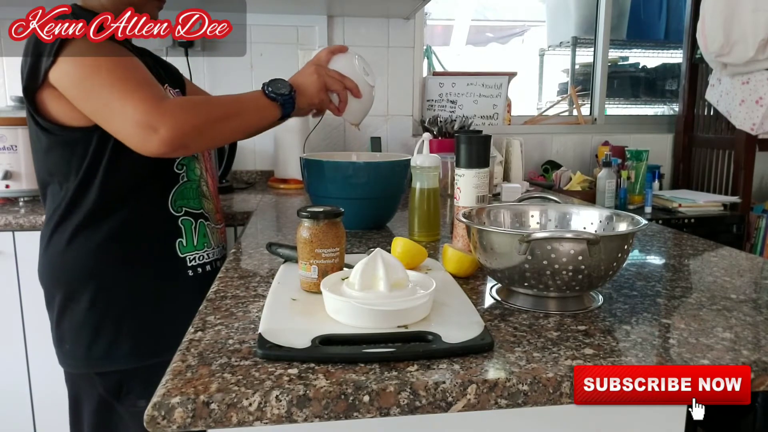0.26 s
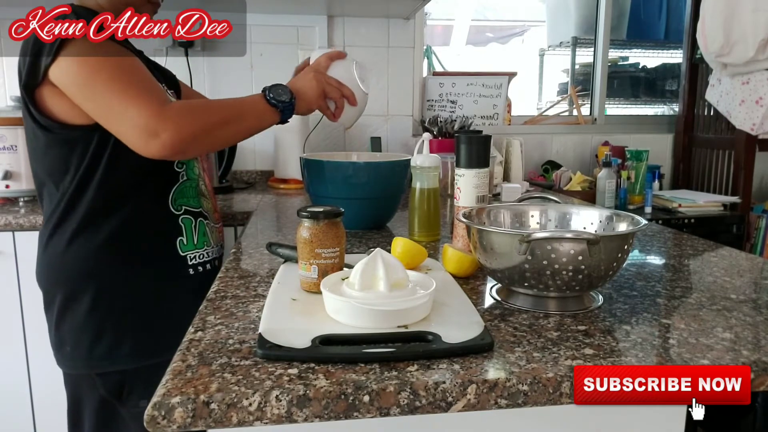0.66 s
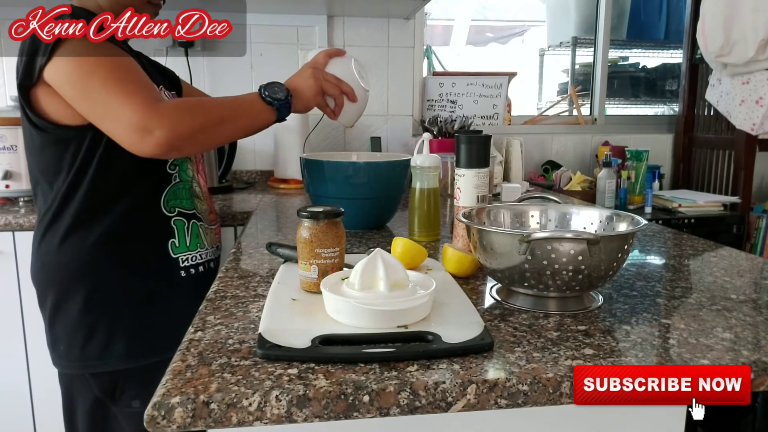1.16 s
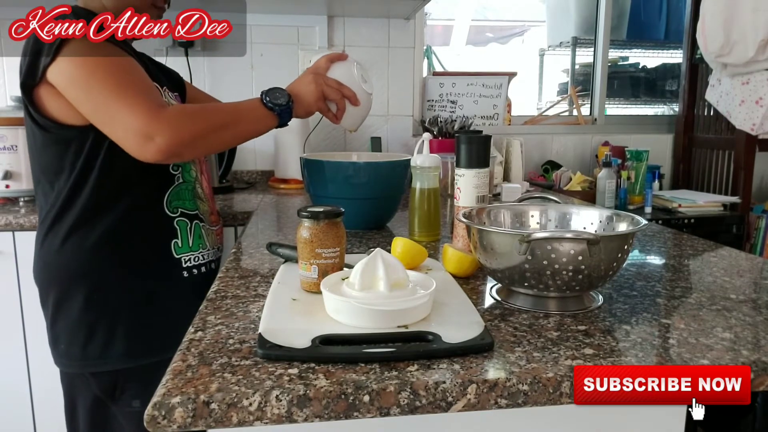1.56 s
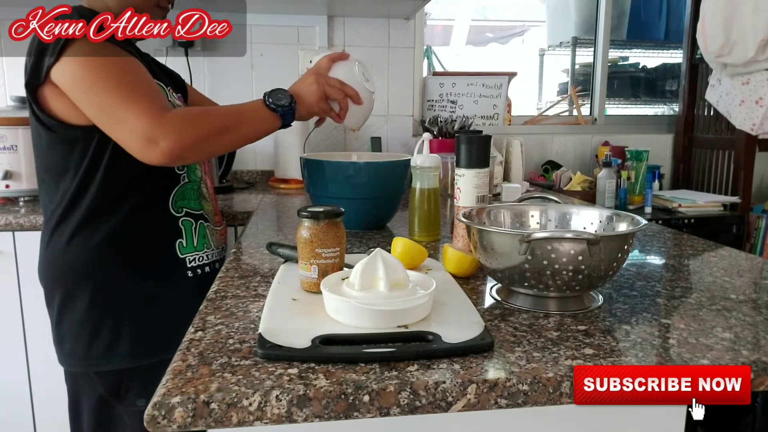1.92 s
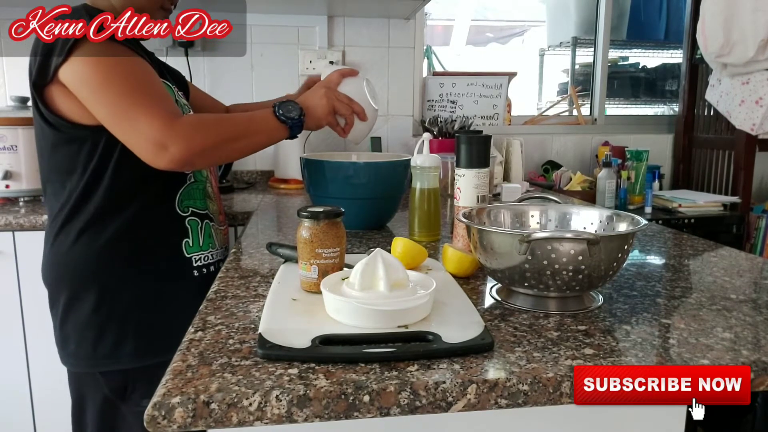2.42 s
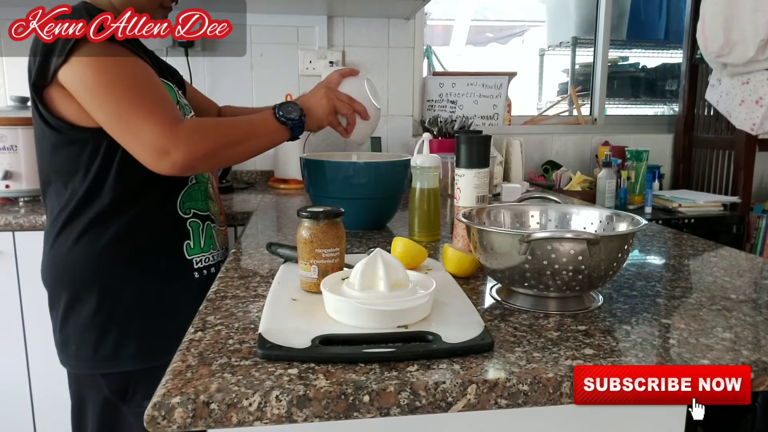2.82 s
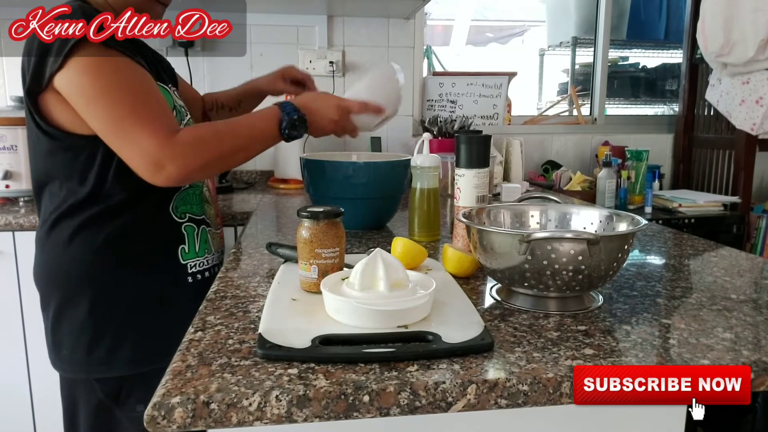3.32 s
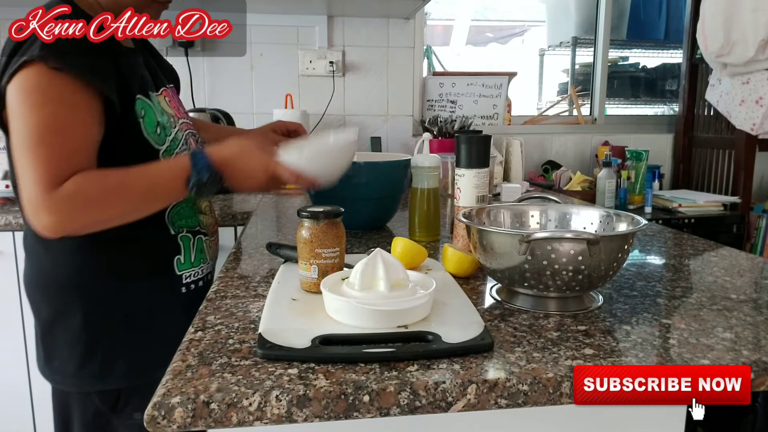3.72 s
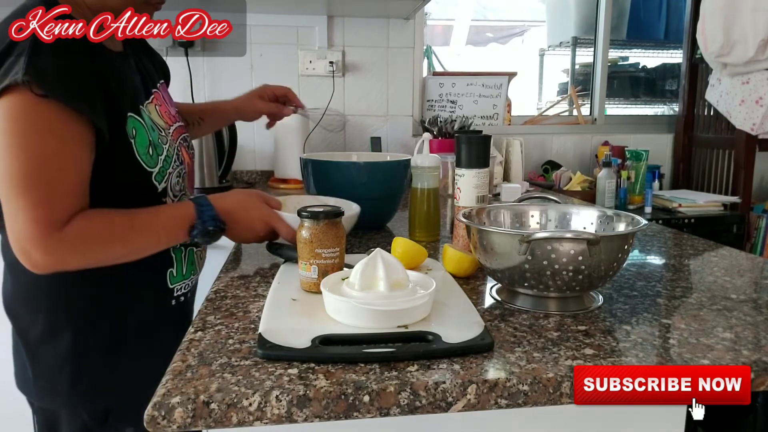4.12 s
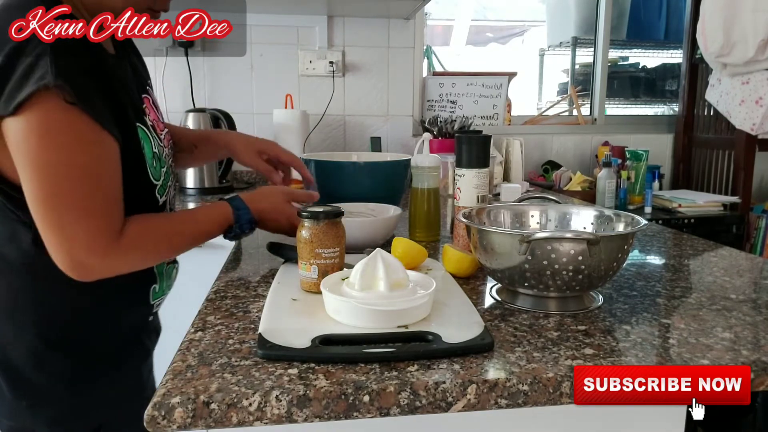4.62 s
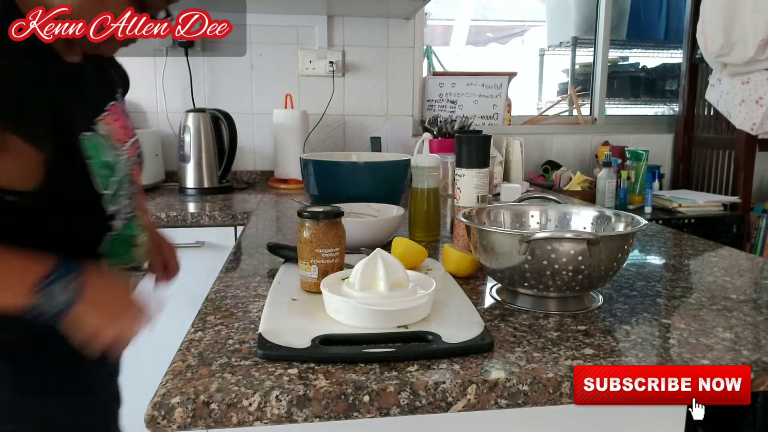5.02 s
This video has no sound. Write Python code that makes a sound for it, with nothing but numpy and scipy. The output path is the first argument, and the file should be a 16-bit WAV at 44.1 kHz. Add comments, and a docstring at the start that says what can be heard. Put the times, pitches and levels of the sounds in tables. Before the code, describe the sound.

Light metallic taps and short dry scrapes repeat unevenly inside a small ceramic bowl. The bowl then clinks twice, pauses, and is set down hard on a stone counter, knocking and rattling in rapid rebounds while the spoon bounces with a high ring. Quiet returns, with slight touches and a soft swish of movement. Stereo microphone a short distance away, slightly left-weighted, hard kitchen reverberation and low background rumble.

```python
"""Spoon scraping a china bowl

In a tiled kitchen a steel spoon scrapes a small bowl, three or four strokes a second: filtered grains of slip.
The bowl clinks twice and is set down rocking on stone; the loose spoon bounces in it: decaying modes and noise.
A soft shuffle follows. Shaped noise rumbles below; the recorder's gain control ducks at the clatter.
"""
import sys
import numpy as np
from scipy import signal
from scipy.fft import rfft, irfft
from scipy.io import wavfile
from scipy.ndimage import uniform_filter1d

SR = 44100
rng = np.random.default_rng(int(sys.argv[2]) if len(sys.argv) > 2 else 0)


def to_wav(sig):
    """Store sig (one row per channel, or 1-D mono) as 16-bit WAV at the path in sys.argv[1].

    Samples outside -1..1 are clipped; the rate is SR.
    """
    pcm = np.clip(np.atleast_2d(sig), -1, 1) * 32767
    pcm = np.round(pcm).astype(np.int16)
    wavfile.write(sys.argv[1], SR, pcm.T)  # frames by channels


N = 232362
TIME = np.arange(N) / SR
CUTOFF_HZ = 15800

# hiss of steel on china, broad shape: (frequency [Hz], relative level [dB])
HISS_SHAPE = [(300, -30.5), (1500, -0.5), (3800, -12.5), (4600, -2), (6500, 0.5), (9500, -2), (12000, -1),
              (15500, 0.5)]
# resonances on that hiss: (frequency [Hz], width [Hz], boost [dB])
HISS_RESONANCES = [(5030, 160, 6.1), (6030, 300, 6), (6620, 380, 5.6), (7800, 270, 4.4), (8940, 260, 2.1),
                   (10300, 200, 4), (12000, 550, 5.6), (12400, 280, 4), (13700, 470, 1.1)]


def from_db(db):
    """Decibels to amplitude gain."""
    return 10 ** (np.asarray(db) / 20)


def rms_one(x):
    """Scale to rms 1."""
    return x / np.sqrt(np.mean(x ** 2) + 1e-20)


def at_hz(points, hz):
    """Interpolate a table on a log-frequency axis."""
    points = np.array(points)
    log_hz = np.log(np.maximum(hz, 1))
    return np.interp(log_hz, np.log(points[:, 0]), points[:, 1])


def add(out, start_s, sound):
    """Mix a short sound into out at start_s."""
    at = round(start_s * SR)
    out[at:at + len(sound)] += sound[:N - at]


def through(x, shape, peaks=(), size=4096):
    """Minimum-phase filter of a body: broad shape plus resonances; keeps the power of white noise."""
    hz = np.arange(size // 2 + 1) * SR / size
    level_db = at_hz(shape, hz)
    for peak_hz, width_hz, db in peaks:
        level_db = level_db + db / (1 + (2 * (hz - peak_hz) / width_hz) ** 2)
    low_cut = (hz + 1) / (hz + shape[0][0])
    gain = from_db(level_db) * low_cut / (1 + (hz / CUTOFF_HZ) ** 20)
    # fold the cepstrum to make the response causal
    cepstrum = irfft(np.log(gain))[:size // 2]
    cepstrum[0] = 0
    response = irfft(np.exp(rfft(2 * cepstrum, size)))
    return signal.fftconvolve(x, response / np.linalg.norm(response))[:N]


def struck(modes, spread_db):
    """Decaying sines (frequency [Hz], level [dB], t60 [s]), each level varied at random per blow."""
    t = TIME[:SR]
    ring = np.zeros(len(t))
    for hz, db, t60_s in modes:
        strength = from_db(db + spread_db * rng.normal())
        ring += strength * np.sin(2 * np.pi * hz * t) * np.exp(-np.log(1000) * t / t60_s)
    return ring


def grains(per_s, spread_db):
    """Tiny slips of uneven size and random sign at random moments; rms 1."""
    sizes = from_db(spread_db * np.minimum(rng.exponential(1, N), 4))
    signed = sizes * rng.choice([-1, 1], N)
    return rms_one(signed * (rng.random(N) < per_s / SR))


def bursts(contacts, decay_s):
    """Each contact (time [s], level [dB]) chatters as decaying random-sign noise."""
    force = np.zeros(N)
    for start_s, db in contacts:
        add(force, start_s, from_db(db) * np.exp(-TIME[:SR // 4] / decay_s))
    return force * rng.choice([-1, 1], N)


def hump(peak_s, swell_s, fade_s):
    """Pressure that swells to 1 at peak_s and fades, Gaussian on each side."""
    width_s = np.where(TIME < peak_s, swell_s, fade_s)
    return np.exp(-np.minimum(((TIME - peak_s) / width_s) ** 2, 50))


def tilted(pair, left_db):
    """Stereo balance: left over right by left_db."""
    return pair * from_db([[left_db / 2], [-left_db / 2]])


def room_tail(size=32768):
    """Diffuse reflections of even colour that die octave by octave; energy 1."""
    # kitchen reverberation: (frequency [Hz], t60 [s])
    kitchen_t60 = [(150, 0.33), (1000, 0.29), (3000, 0.21), (7000, 0.26), (11000, 0.29), (15000, 0.26)]
    t, hz = TIME[:size], np.arange(size // 2 + 1) * SR / size
    octave = np.round(np.log2(np.clip(hz, 125, 16000) / 125))
    white = rfft(rng.standard_normal(size))
    tail = np.zeros(size)
    for k in np.unique(octave):
        band = octave == k
        t60_s = at_hz(kitchen_t60, hz[band].mean())
        tail += irfft(white * band) * np.exp(-np.log(1000) * t / t60_s)
    spectrum = rfft(tail * (1 - np.exp(-t / 0.001)))
    # even out the colour, then close the far end
    tail = irfft(spectrum / np.sqrt(np.abs(spectrum) + 1e-9)) / (1 + (t / 0.3) ** 10)
    return tail / np.linalg.norm(tail)


def kitchen(x, wet_db, left_db, lag_samples=4):
    """Direct sound, later on the right, plus a separate room tail per channel, power-normalised."""
    direct = np.array([x, np.roll(x, lag_samples)])
    echoes = np.array([signal.fftconvolve(x, room_tail())[:N] for channel in direct])
    wet = from_db(wet_db)
    return tilted((direct + wet * echoes) / np.hypot(1, wet), left_db)


def background(spectrum, level_db, left_db):
    """Steady shaped noise, much alike in both channels in the bass only."""
    # stereo image: (frequency [Hz], left-right likeness [0..1])
    likeness = [(60, 0.97), (130, 0.89), (250, 0.86), (500, 0.45), (1000, 0.15), (2500, 0.048), (10000, .1)]
    hz = np.arange(N // 2 + 1) * SR / N
    alike = np.clip(at_hz(likeness, hz), 0, 1)
    gain = from_db(at_hz(spectrum, hz)) * hz / (hz + spectrum[0][0])
    mid, side = rfft(rng.standard_normal((2, N))) * gain
    pair = irfft(np.sqrt(1 + alike) * mid + np.sqrt(1 - alike) * side * [[1], [-1]], N)
    return tilted(from_db(level_db) * rms_one(pair), left_db)


def room_noise():
    """Low rumble and the faint air above it."""
    # rumble: (frequency [Hz], relative density [dB per Hz])
    rumble_spectrum = [(15, -51.5), (25, -25), (32, -18.5), (45, -27.5), (58, -2), (85, 1.5), (113, -1),
                       (128, -11.5), (149, -4.5), (179, -7), (249, -4.5), (266, -3.5), (415, -13),
                       (792, -17.5), (1300, -26.5), (1690, -51), (2860, -120)]
    # air: (frequency [Hz], relative density [dB per Hz])
    air_spectrum = [(600, -10.5), (1300, -2), (1900, -7), (2700, -14.5), (3400, -22.5), (5000, -28),
                    (6500, -26.5), (9000, -30.5), (15500, -32)]
    rumble = background(rumble_spectrum, level_db=-41.5, left_db=-3.0)
    return rumble + background(air_spectrum, level_db=-61.0, left_db=-4.0)


def shuffle():
    """Soft swish of feet and clothes as the cook steps away: dense grains under an envelope."""
    # envelope: (time [s], level [dB])
    swish_levels = [(5.16, -70.5), (5.21, -51.5), (5.245, -40.5), (5.27, -49)]
    # spectrum: (frequency [Hz], relative level [dB])
    swish_shape = [(300, 9), (1600, -4), (3500, -3.5), (6000, -6), (10000, -18), (15500, -29)]
    level = from_db(np.interp(TIME, *np.transpose(swish_levels), left=-200))
    swish = through(level * grains(per_s=14000, spread_db=3.5), swish_shape)
    return kitchen(swish, wet_db=3.0, left_db=0.0)


def loose_spoon():
    """Let go, the spoon bounces in the bowl and its free modes ring high."""
    # bounces: (time [s], level [dB])
    bounces = [(4.5723, -22.5), (4.581, -27.5), (4.603, -26.5)]
    # free spoon modes: (frequency [Hz], level [dB], t60 [s])
    spoon_modes = [(4883, -16, .25), (5825, -5, .13), (6595, -11, .17), (7903, -2, .07), (8936, -10, .13),
                   (10550, -11, .15), (11020, -1, .2), (12880, -1, .16), (14910, 1, .14), (15520, 5, .12)]
    ticks = through(bursts(bounces, decay_s=0.0081), HISS_SHAPE, HISS_RESONANCES)
    rings = np.zeros(N)
    for start_s, db in bounces:
        add(rings, start_s, from_db(db) * struck(spoon_modes, spread_db=3.9))
    return kitchen(from_db(2.0) * ticks + rings, wet_db=0.0, left_db=-2.5)


def clinks():
    """The china rings freely; the place struck sets the strength of each mode."""
    # clinks: (time [s], level [dB], place [0 rim .. 1 wall against the mixing bowl])
    clink_hits = [(3.697, -29, 0.03), (3.892, -30, 0.92)]
    # china and what it touches: (frequency [Hz], t60 [s], level at rim [dB], level at wall [dB])
    china_modes = [(985, 1.2, -45, -17), (1750, .56, -2, -12), (2670, .37, -1, -7), (3716, .18, -9, -7),
                   (4097, .1, -22, 3), (4275, .14, -13, -1), (4414, .12, -22, -6), (4915, .21, -26, 0),
                   (6444, .14, -15, -25), (7630, .14, -10, -14), (9181, .15, -2, -3), (9609, .17, -30, -11),
                   (10835, .16, -15, -14), (11460, .18, -20, -10), (12580, .15, -22, -3),
                   (13430, .15, -20, -13), (14440, .11, -10, -9)]
    contacts = [(start_s, db - 2.5) for start_s, db, place in clink_hits]
    ticks = through(bursts(contacts, decay_s=0.017), HISS_SHAPE, HISS_RESONANCES)
    rings = np.zeros(N)
    for start_s, db, place in clink_hits:
        modes = [(hz, db + rim_db + place * (wall_db - rim_db), t60_s)
                 for hz, t60_s, rim_db, wall_db in china_modes]
        add(rings, start_s, struck(modes, spread_db=2.0))
    return kitchen(ticks, wet_db=27.0, left_db=0.0) + kitchen(rings, wet_db=1.5, left_db=-7.5)


def rocking(count=20):
    """Landings of the foot, each with a fading run of uneven rebounds: (time, thud dB, crack dB)."""
    # landings: (time [s], thud [dB], crack [dB], mean rebound gap [s], rocking time [s])
    landings = [(4.295, -18, -52, .006, 0.007), (4.3287, -12, -48.5, .017, .048),
                (4.47, -28, -37.5, .008, .06), (4.487, -24.5, -3, .0068, .05),
                (4.5045, -10, -21, .0042, .025), (4.5505, -8, -7.5, .0058, .04),
                (4.5808, -2, -0.5, .0103, .07), (4.6009, -8, -20, .0105, 0.13)]
    fade_over_run_db, crack_softer_db, uneven_share = 26.5, 9, 0.128
    contacts = []
    for start_s, thud_db, crack_db, gap_s, lasts_s in landings:
        contacts.append((start_s, thud_db, crack_db))
        delays_s = np.cumsum(gap_s * (1 + uneven_share * rng.uniform(-1, 1, count)))
        for delay_s in delays_s[delays_s < lasts_s]:
            fade_db = fade_over_run_db * delay_s / lasts_s
            contacts.append((start_s + delay_s, thud_db - fade_db, crack_db - fade_db - crack_softer_db))
    return contacts


def setting_down():
    """The foot rocks to rest on stone: modal thuds, a slab boom on heavy knocks, cracks on hard ones."""
    # bowl on stone: (frequency [Hz], level [dB], t60 [s])
    foot_modes = [(580, -17, 0.031), (673, -15, 0.054), (835, -27.5, 0.024), (994, -5.5, 0.062),
                  (1087, -3, 0.023), (1145, -2.5, 0.022), (1395, -6, 0.029), (1770, -10, 0.01),
                  (2085, -27, .012)]
    # counter slab: (frequency [Hz], level [dB], t60 [s])
    slab_modes = [(112, -26.5, 0.11), (198, -14, 0.072), (340, -20, .06)]
    # bright edge of a hard knock: (frequency [Hz], relative level [dB])
    crack_shape = [(400, -7), (1500, 14.5), (3400, 4.5), (6200, -4), (7500, -6), (15500, -17)]
    # its resonances: (frequency [Hz], width [Hz], boost [dB])
    crack_resonances = [(2690, 130, 1), (3600, 600, 2), (6100, 720, 3.8)]
    thuds, boom, contacts = np.zeros(N), np.zeros(N), rocking()
    for start_s, thud_db, crack_db in contacts:
        force = from_db(thud_db)
        add(thuds, start_s, force * struck(foot_modes, spread_db=2.5))
        # squared: the slab favours heavy knocks
        add(boom, start_s, force ** 2 * struck(slab_modes, spread_db=2))
    # the small bowl radiates no bass, and the contact is too long to excite the treble
    lowest_hz, contact_hz = 540, 2150
    band = signal.butter(4, [lowest_hz, contact_hz], "band", fs=SR, output="sos")
    thuds = signal.sosfilt(band, thuds + 1e-18)
    hard = [(start_s, crack_db) for start_s, thud_db, crack_db in contacts]
    cracks = through(bursts(hard, decay_s=0.0018), crack_shape, crack_resonances)
    return kitchen(thuds + boom, wet_db=-0.5, left_db=-3.0) + kitchen(cracks, wet_db=7.0, left_db=-1.5)


def scraping():
    """Strokes land with a tick and drag: fine slips hiss in the belly, the edge rasps lower at the rim."""
    # strokes, landing to rim: (time [s], length [s], tap [dB], belly hiss [dB], rim rasp [dB])
    strokes = [(.113, 0.048, -28.5, -49, -46.5), (0.343, 0.11, -32, -53.5, -55.5),
               (0.622, 0.064, -33.5, -47.5, -71), (0.751, 0.011, -29, -34.5, -42),
               (0.949, 0.15, -34, -45, -51), (1.218, 0.12, -31.5, -46, -50.5),
               (1.492, 0.18, -30.5, -47, -40.5), (1.794, .16, -30.5, -48, -48.5),
               (2.085, 0.13, -31.5, -41.5, -44.5), (2.399, 0.15, -34.5, -46, -39.5),
               (2.617, 0.224, -35.5, -53, -40.5), (3.059, 0.049, -34, -36, -38),
               (3.9, 0.18, -60, -51.5, -63.5), (4.394, 0.094, -20, -43, -28),
               (4.924, 0.076, -77, -67, -68.5)]
    # light touches with no drag: (time [s], level [dB])
    touches = [(.001, -47.5), (4.294, -53), (4.329, -43.5), (5.1, -46)]
    # tap and rasp, broad shapes: (frequency [Hz], relative level [dB])
    tap_shape = [(400, -26), (1500, -2.5), (3800, -11), (5000, 0), (7000, 3), (10500, -5), (15500, -2.5)]
    rasp_shape = [(300, 0.5), (1200, -0.5), (1900, -1.5), (3300, -3), (4800, 4.5), (6500, -2.5),
                  (9000, -33), (15500, -27)]
    # their resonances: (frequency [Hz], width [Hz], boost [dB])
    tap_resonances = [(6000, 320, 16.3), (6860, 360, 5), (8100, 210, 6), (8990, 250, 3.3),
                      (11800, 550, 7.4), (11940, 500, 6)]
    rasp_resonances = [(2800, 270, 3.4), (3040, 310, 13), (3430, 200, 2.7), (4554, 200, 8.2),
                       (4800, 110, 3.5)]
    # held spoon, damped by the fingers: (frequency [Hz], level [dB], t60 [s])
    held_modes = [(5902, -8, 0.052), (5990, -9, .04), (7740, -13.5, 0.027), (9030, -15, .03)]
    rebound_s, rebound_loss_db = 0.018, 10
    # belly place and width as shares of the stroke
    belly_at, belly_width, belly_least_s = 0.62, 0.27, 0.017
    # rim hiss relative to its rasp; belly rasp relative to its hiss
    rim_swell_s, rim_fade_s, rim_hiss_db, belly_rasp_db = 0.023, 0.016, -1, -13

    slips, catches = grains(per_s=1500, spread_db=5.5), grains(per_s=470, spread_db=5.0)
    drag, taps = np.zeros(N), list(touches)
    for start_s, length_s, tap_db, hiss_db, rasp_db in strokes:
        taps += [(start_s, tap_db), (start_s + rebound_s, tap_db - rebound_loss_db)]
        near = (TIME >= start_s) & (TIME < start_s + 2 * length_s + np.pi * rim_fade_s)
        width_s = belly_least_s + belly_width * length_s
        belly = from_db(hiss_db) * hump(start_s + belly_at * length_s, width_s, width_s)[near]
        rim = from_db(rasp_db) * hump(start_s + length_s, rim_swell_s, rim_fade_s)[near]
        hiss = np.hypot(belly, from_db(rim_hiss_db) * rim)
        rasp = np.hypot(rim, from_db(belly_rasp_db) * belly)
        for force, pressure, shape, peaks in ((slips, hiss, HISS_SHAPE, HISS_RESONANCES),
                                              (catches, rasp, rasp_shape, rasp_resonances)):
            # each stroke touches another spot, so the resonances answer with other strengths
            spot = [(hz, width_hz, db * rng.uniform(0.5, 1.5)) for hz, width_hz, db in peaks]
            add(drag, start_s, through(pressure * rms_one(force[near]), shape, spot))
    contacts = [(start_s, db - 3) for start_s, db in taps]
    ticks = through(bursts(contacts, decay_s=0.0058), tap_shape, tap_resonances)
    for start_s, db in taps:
        add(ticks, start_s, from_db(db) * struck(held_modes, spread_db=1.5))
    return kitchen(ticks, wet_db=8.5, left_db=-2.5) + kitchen(drag, wet_db=7.0, left_db=-2.0)


def scene():
    """Everything at the counter, over the noise of the room."""
    return room_noise() + shuffle() + loose_spoon() + clinks() + setting_down() + scraping()


def gain_control(x, threshold_db, sink_db_per_s):
    """Sound over the threshold turns the gain down; it never recovers and sinks slowly throughout."""
    power = uniform_filter1d(np.mean(x ** 2, axis=0), size=441)  # 10 ms
    over_db = np.maximum(10 * np.log10(np.maximum(power, 1e-12)) - threshold_db, 0)
    sink_db = sink_db_per_s * TIME
    reduction_db = np.maximum.accumulate(over_db - sink_db) + sink_db
    return x * from_db(-uniform_filter1d(reduction_db, size=88))  # 2 ms


def record(dry):
    """Gain control, rounded peaks, and a steep cut at the top."""
    rounded = np.tanh(gain_control(dry, threshold_db=-12.0, sink_db_per_s=0.5))
    low_pass = signal.ellip(12, 0.1, 80, CUTOFF_HZ, fs=SR, output="sos")
    return signal.sosfilt(low_pass, rounded)


dry = scene()
out = record(dry)
to_wav(out)
```